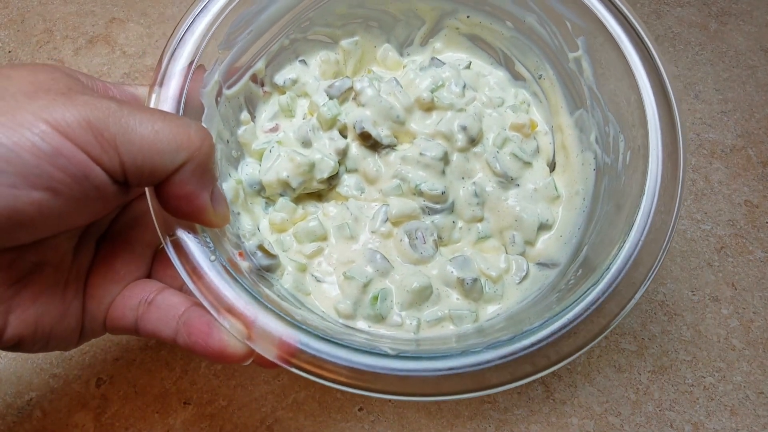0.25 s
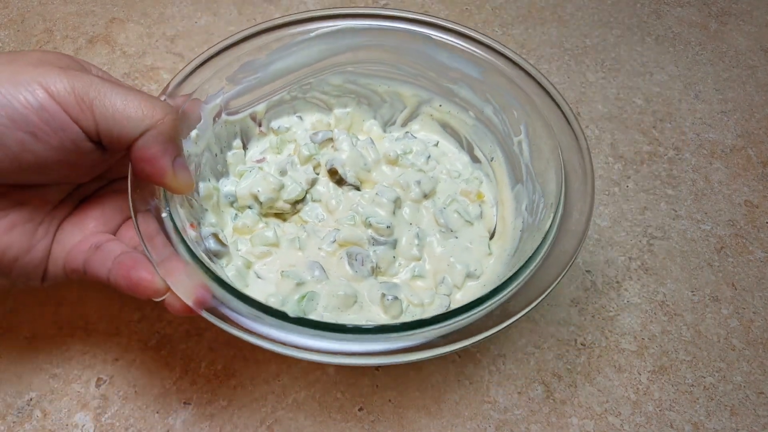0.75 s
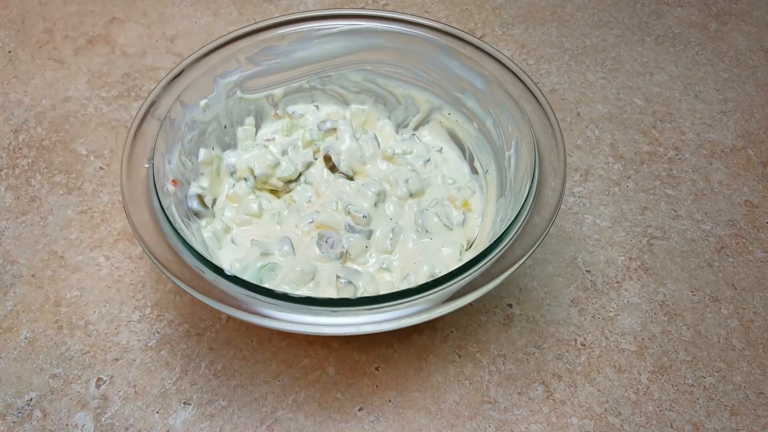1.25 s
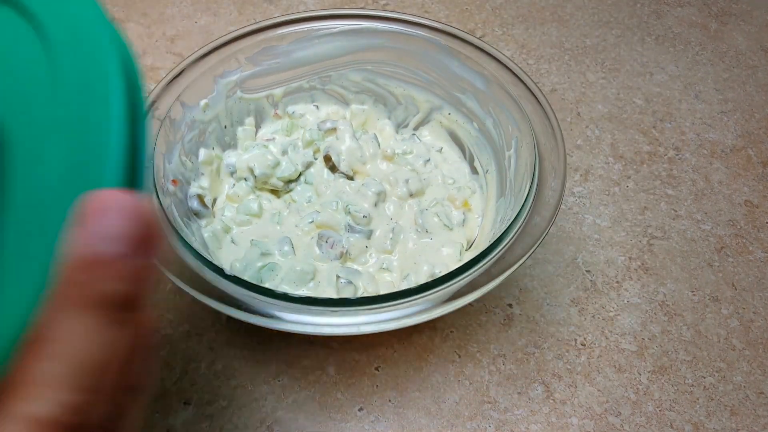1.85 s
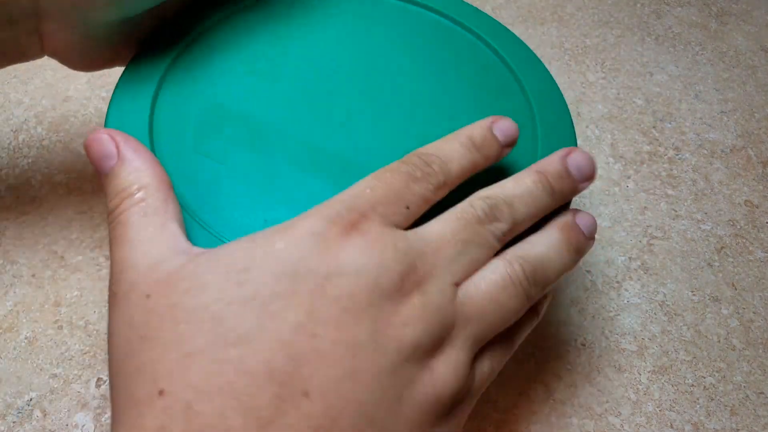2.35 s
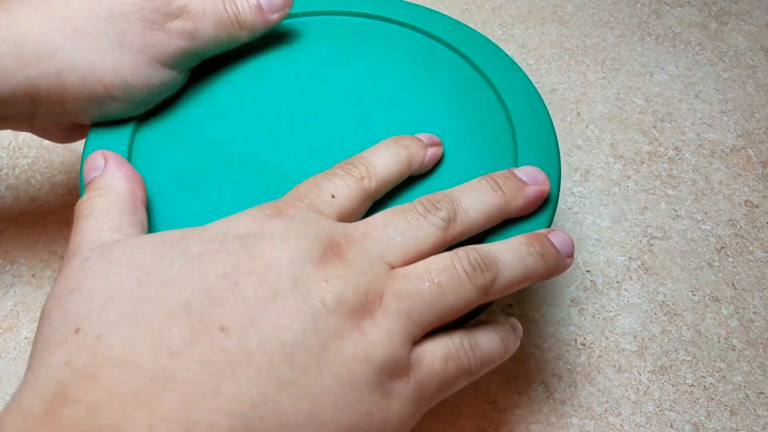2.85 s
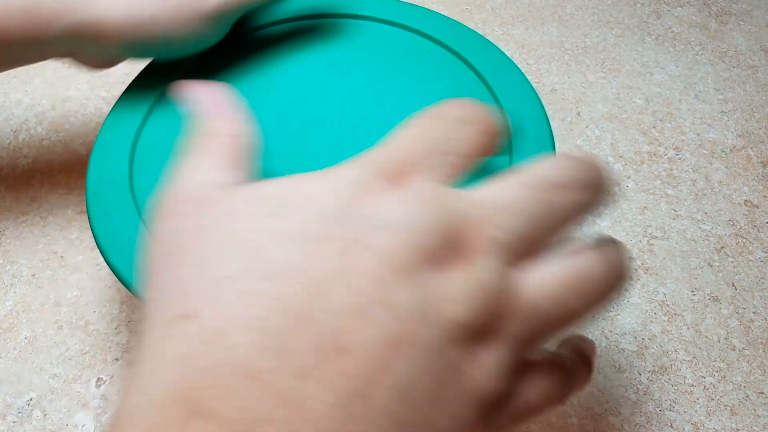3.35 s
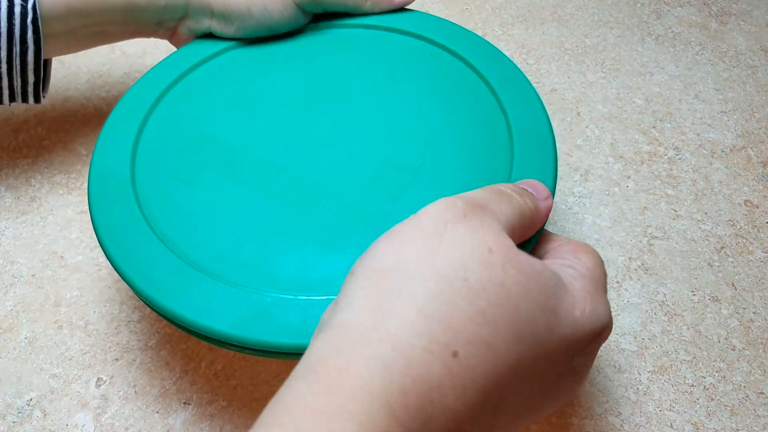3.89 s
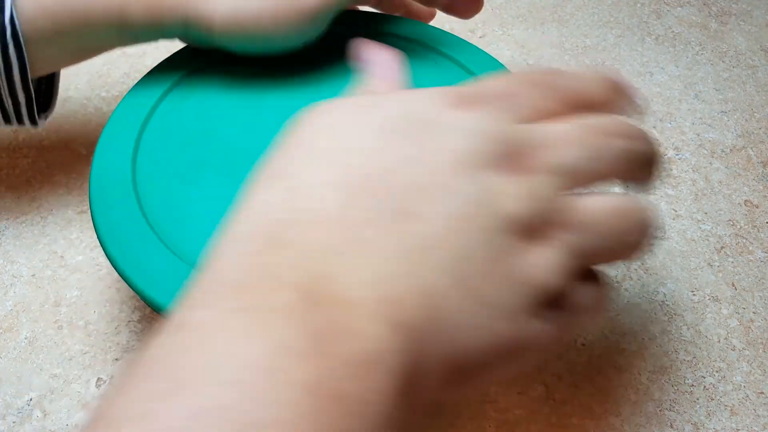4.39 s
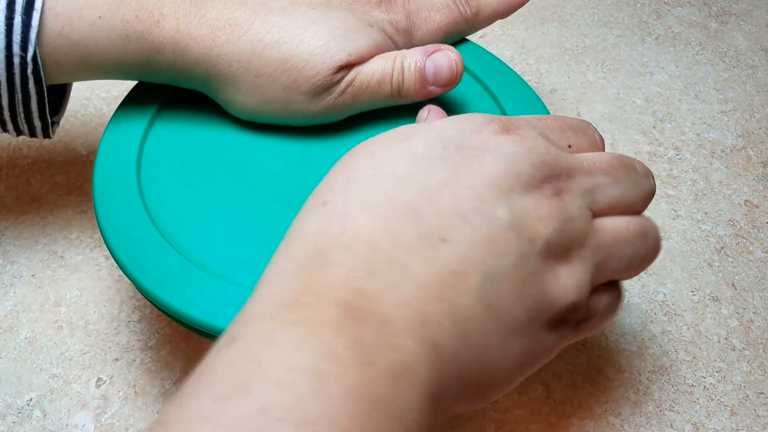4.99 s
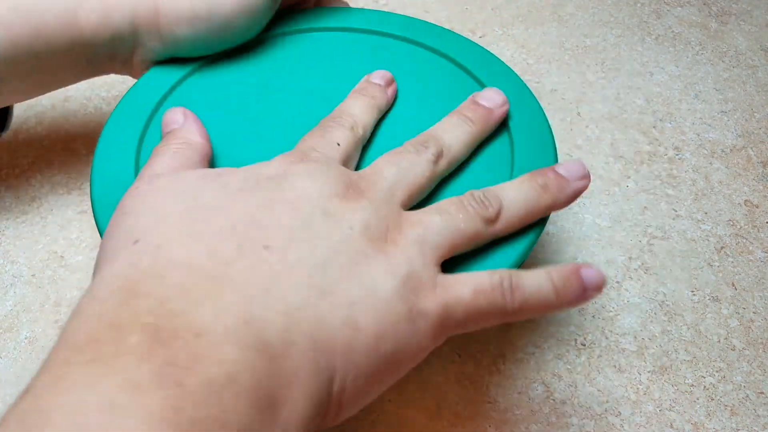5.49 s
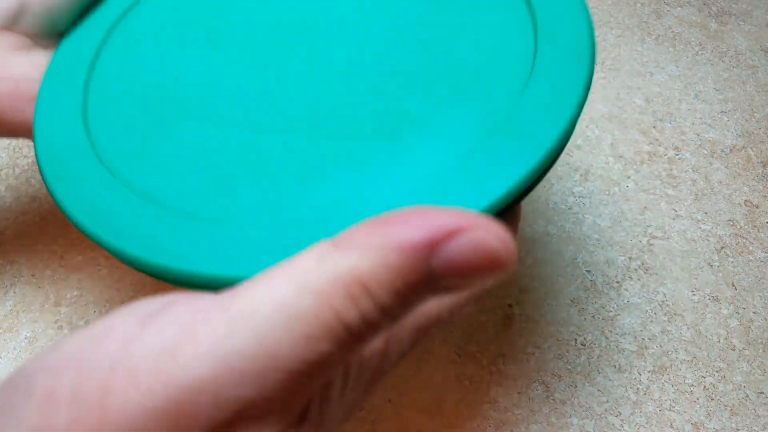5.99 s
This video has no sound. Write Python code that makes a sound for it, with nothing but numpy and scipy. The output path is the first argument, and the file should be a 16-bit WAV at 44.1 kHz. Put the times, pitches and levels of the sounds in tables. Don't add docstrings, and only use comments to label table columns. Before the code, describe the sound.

In a quiet kitchen with a low fridge hum, a heavy glass bowl lands on a hard counter with a knock and small rocking taps. Hands brush a plastic lid into place, then press it down in strong hollow snaps, with skin rubbing between them. Final knocks come as the bowl shifts. Close stereo microphones, short room reflections.

```python
import sys
import numpy as np
from scipy import signal
from scipy.io import wavfile
from scipy.ndimage import uniform_filter1d

SR = 44100
rng = np.random.default_rng(int(sys.argv[2]) if len(sys.argv) > 2 else 0)


def generate_wav(signal):
    frames = np.transpose(np.atleast_2d(signal))
    scaled = np.clip(frames, -1, 1) * 32767
    pcm = np.round(scaled).astype(np.int16)
    wavfile.write(sys.argv[1], SR, pcm)


def elevation(decibels):
    levels = np.asarray(decibels, float)
    return 10 ** (levels / 20)


N = 275004


def at_hz(points, hz):
    table_hz, value = np.transpose(points)
    return np.interp(np.log(hz), np.log(table_hz), value)


def rms_one(x):
    return x / np.sqrt(np.mean(x ** 2) + 1e-20)


def drift(rate):
    steps = rng.standard_normal(int(N / SR * 60) + 2)
    slow = uniform_filter1d(steps, size=max(1, int(30 / rate)), mode="wrap")
    return np.interp(np.arange(N) / SR * 60, np.arange(len(slow)), rms_one(slow))


def peak(x, hz, width):
    r = np.exp(-np.pi * width / SR)
    poles = [1, -2 * r * np.cos(2 * np.pi * hz / SR), r * r]
    return signal.lfilter([(1 - r * r) / 2, 0, (r * r - 1) / 2], poles, x)


def twice_peaked(x, hz, width):
    return rms_one(peak(peak(x, hz, width), hz, width))


def band_pass(low, high):
    return signal.butter(2, [low, high], "band", fs=SR, output="sos")


def coloured(spectrum, patchy_db, first=0):
    # frequency in Hz, left-right likeness (1 = same).
    likeness = [(30, 0.79), (250, 0.93), (1000, 0.024), (16000, 0.012)]
    edges = 25 * 2 ** np.arange(first / 2, 9.6, .5)
    white, together = rng.standard_normal((2, 2, N)), drift(44)
    out = 0
    for k, (low, high) in enumerate(zip(edges, edges[1:])):
        hz = np.sqrt(low * high)
        mid, side = signal.sosfilt(band_pass(low, high), white[k % 2])
        alike = np.clip(at_hz(likeness, hz), -1, 1)
        flicker_db = patchy_db * (together + .5 * drift(29))
        gain = elevation(at_hz(spectrum, hz) + flicker_db)
        out = out + gain * (np.sqrt(1 + alike) * mid + np.sqrt(1 - alike) * side * [[1], [-1]])
    return rms_one(out)


def room_tone():
    # frequency in Hz, level in dB per Hz.
    air_spectrum = [(15, -46), (25, 1), (59, 4.5), (92, -14), (134, 10), (206, -12), (242, -3), (394, 8),
                    (476, -8), (531, 9), (1020, -25.5), (1650, -19), (16000, -90)]
    # frequency in Hz, width in Hz, level in dB.
    hum_lines = [(124.8, 16, -61.5), (172.2, 38, -58), (243.6, 20, -55), (339, 39, -59), (484.8, 11, -65.5),
                 (1028, 7, -72.5), (5150, 200, -87), (12200, 300, -88)]
    white = rng.standard_normal((2, N))
    shared = white[0] + 0.27 * white[1] * [[1], [-1]]
    hum = sum(elevation(db) * twice_peaked(shared, hz, width) for hz, width, db in hum_lines)
    return hum + elevation(-54) * coloured(air_spectrum, patchy_db=0.4)


def kitchen(x):
    # low edge in Hz, high edge in Hz, t60 in seconds, level in dB.
    reflections = [(65, 103, .3, -16.5), (120, 254, 0.14, -4.5), (248, 440, 0.45, -12.5),
                   (455, 827, 0.23, -12), (717, 1440, 0.37, -17), (1190, 1740, 0.15, -16.5),
                   (2000, 2650, 0.16, -8), (3050, 4700, 0.16, -8.5), (4400, 11300, 0.35, -15),
                   (8100, 9000, 0.17, -3), (10800, 12000, .23, -5.5)]
    white, out = rng.standard_normal((2, 2, N)), 0
    for k, (low, high, t60, db) in enumerate(reflections):
        band = band_pass(low, high)
        held = elevation(-120 / (t60 * SR))
        energy = signal.sosfilt(band, x[0]) ** 2 + 1e-18
        stored = signal.lfilter([1 - held], [1, -held], energy)
        stored = signal.lfilter([.01], [1, -.99], stored)
        mid, side = rms_one(signal.sosfilt(band, white[k % 2]))
        apart = min(low / 900, 1)
        out = out + elevation(db) * np.sqrt(stored) * (mid + apart * side * [[1], [-1]])
    return out


def stroking():
    # start in seconds, length in seconds, scuff on counter and lid in dB,
    # skin hiss in dB.
    strokes = [(0.418, 0.2, -55.5, -77), (0.625, 0.028, -47.5, -83), (0.71, .11, -53.5, -76),
               (0.76, 0.39, -73, -60.5), (1.266, 0.31, -61, -62), (1.428, 0.13, -44.5, -64),
               (1.467, 0.4, -62, -63.5), (1.72, 0.66, -61.5, -63.5), (2.326, 0.27, -46.5, -69),
               (2.555, 0.052, -58, -73), (2.609, 0.25, -47, -64.5), (2.929, 0.43, -50.5, -64),
               (3.2, 0.51, -64, -67.5), (3.547, 0.073, -56.5, -78), (3.773, 0.049, -49.5, -67),
               (3.858, 0.25, -60, -71.5), (4.115, 0.17, -54.5, -64.5), (4.267, 0.062, -54, -63.5),
               (4.293, 0.2, -61, -71), (4.556, 0.16, -58, -63.5), (4.725, 0.17, -74, -61.5),
               (4.93, 0.098, -60, -61.5), (5.261, 0.22, -55, -61.5), (5.423, 0.13, -57.5, -62),
               (5.592, 0.19, -50, -66), (5.784, 0.2, -45.5, -70), (5.877, 0.31, -56, -86)]
    rise, fall = 0.27, 0.62
    t = np.arange(N) / SR
    power = elevation([[-62], [-74]]) ** 2
    for start, length, scuff_db, skin_db in strokes:
        done = (t - start) / length
        speed = np.clip(np.minimum(done / rise, (1 - done) / fall), 0, 1)
        power = power + (elevation([[scuff_db], [skin_db]]) * np.sin(np.pi / 2 * speed) ** 2) ** 2
    return np.sqrt(power)


def hands():
    # frequency in Hz, level in dB per Hz.
    scuff_spectrum = [(180, -65), (300, 24), (347, 0), (595, 3), (1200, 0), (1350, -2), (2500, -10.5),
                      (7000, -58), (9100, -64), (15400, -120)]
    # frequency in Hz, level in dB per Hz.
    skin_spectrum = [(1470, -26), (2500, -0.5), (5030, -5.5), (7360, -8), (8400, -2), (9220, -10),
                     (14700, -3), (16000, -8)]
    scuff_gain, skin_gain = stroking()
    slips = (rng.random(N) < 900 / SR) * rng.exponential(1, N)
    grain = 4 + signal.lfilter([1], [1, -np.exp(-1 / (.002 * SR))], slips)
    scuff = rms_one(grain * coloured(scuff_spectrum, .8, first=6))
    skin = coloured(skin_spectrum, 1.2, first=12)
    return elevation(2.0) * scuff_gain * scuff + elevation(5.0) * skin_gain * skin


def squeak():
    # start in seconds, end in seconds, frequency in Hz, width in Hz, level in dB.
    thumb_drag = (3.86, 3.99, 2100, 220, -68)
    start, end, hz, width, db = thumb_drag
    t = np.arange(N) / SR
    drag = np.clip(np.minimum(t - start, end - t) / 0.018, 0, 1)
    noise = rng.standard_normal(N)
    return elevation(db) * drag * sum(twice_peaked(noise, hz / k, width / k) for k in (1, 2))


def trapped_air():
    # start in seconds, level in dB, frequency in Hz, t60 in seconds.
    pushes = [(2.245, -24.5, 650, 0.057), (2.988, -30, 178, 0.051), (2.989, -17, 825, 0.031),
              (4.538, -22, 588, 0.06), (4.539, -38.5, 3100, 0.017), (3.782, -28, 238.5, 0.19),
              (3.9955, -3.5, 285, 0.062), (4.008, -11, 262, 0.067), (4.164, -37, 310.7, 0.27),
              (5.506, -3.5, 311, 0.047), (5.855, -27, 286, 0.12)]
    out = np.zeros(N)
    for s, db, hz, t60 in pushes:
        t = np.maximum(np.arange(N) / SR - s, 0)
        out += elevation(db - 60 * t / t60) * (1 - np.exp(-t * hz)) * np.sin(2 * np.pi * hz * t)
    return out * [[1], [1]]


def blows(rows):
    s, force_db, weight_db, hardness_db, brightness_db = np.transpose(rows)
    clack_db, thump_db, snap_db = force_db + hardness_db, force_db + weight_db, force_db + brightness_db
    crack_db = (clack_db + snap_db) / 2 + 6
    return list(zip(s, clack_db, force_db, thump_db, snap_db, crack_db))


def clicks(at, db, lag_s):
    out = np.full((2, N), 1e-18)
    np.add.at(out[0], (at * SR).astype(int), elevation(db[0]))
    np.add.at(out[1], ((at + lag_s) * SR).astype(int), elevation(db[1]))
    return out


def struck(hits, modes, lag_s, spread_db, softness, give_s, snap_db, snap_s):
    reach_hz = (110, 330, 900, 2400)
    # frequency in Hz, width in Hz, level in dB.
    snap_peaks = [(5500, 7800, 8), (8250, 14400, 10.5), (13800, 3800, 7.5)]
    at, clack, knock, thump, snap, crack = np.transpose(hits)
    drives_db = np.transpose([thump, knock, clack, crack])
    chance = rng.standard_normal((len(at), len(modes), 3))
    out = 0
    for k, (hz, db, t60) in enumerate(modes):
        force_db = np.array([np.interp(np.log(hz), np.log(reach_hz), row) for row in drives_db])
        sides_db = spread_db * min(.5 + hz / 900, 1.5) * chance[:, k, 1:].T
        sides_db = sides_db + (hz < 200) * np.array([[-1.3], [1.3]])
        moved = at + give_s * (hz < 500)
        train = clicks(moved, force_db + db + spread_db * chance[:, k, 0] + sides_db, lag_s)
        r, w = elevation(-60 / (t60 * SR)), 2 * np.pi * hz / SR
        soft = np.exp(-w / softness)
        swell = np.convolve([1, -2 * soft, soft ** 2], [1, -2 * r * np.cos(w), r * r])
        gain = np.sin(w) * (1 - soft) ** 2 * (1 + softness ** 2)
        out = out + signal.lfilter([0, gain], swell, train)
    train = clicks(at, np.tile(snap + snap_db, (2, 1)), lag_s)
    noise = rng.standard_normal(N)
    noise = np.array([noise, np.roll(noise, int(lag_s * SR))])
    burst = noise * signal.lfilter([1], [1, -np.exp(-1 / (snap_s * SR))], train)
    for k, (hz, width, db) in enumerate(snap_peaks):
        out = out + elevation(db) * (-1) ** k * peak(burst, hz, width)
    return out


def no_deep_bass(x):
    return signal.sosfilt(signal.butter(6, 62, "high", fs=SR, output="sos"), x)


def lid_on_rim():
    # start in seconds, force in dB, then weight, hardness and brightness
    # in dB against the force.
    lid_hits = [(0.438, -51, -8, 6, -22), (0.637, -70, -9, 6, -8), (1.756, -55, 22, 13.5, 18.5),
                (1.762, -56, 21, 15.5, 15.5), (2.227, -44.5, -27, 8, -6), (2.245, -33.5, -36, 12, -6.5),
                (2.298, -32, -13, -5.5, -10.5), (2.336, -58, 10, 13, 10.5), (2.63, -51, 16, -2, -4.5),
                (2.988, -6.5, -13, -7.5, -19), (2.994, -11, -15, -33, -28), (3.142, -31, -2.5, 1, -22),
                (3.55, -62, 15, 23, -35), (3.786, -28, -10, -28, -27), (3.9975, -9.5, -13, -10, -31.5),
                (4.011, -20, -13, -21, -30), (4.184, -56, 13, -5, 8.5), (4.501, -33.5, -25, -7, -35),
                (5.102, -38, 4, 11.5, -28.5), (5.107, -24, -2, -12, -22), (5.504, -3.5, -16.5, -15.5, -37),
                (5.512, -34, -26, -6, -13)]
    # start in seconds, force in dB, weight in dB against the force.
    presses = [
        (2.518, -37.5, -2),
        (2.936, -39.5, 5),
        (3.096, -40.5, 11),
        (3.6, -56, 18),
        (4.169, -23.5, -37),
        (4.62, -34.5, -1.5),
        (5.099, -26.5, -25),
    ]
    # start in seconds, snap in dB, crack in dB.
    ticks = [(0.169, -80, -68), (0.9556, -43.5, -37), (1.44, -64, -45), (1.5005, -49, -31.5),
             (2.5687, -47.5, -62), (2.52, -76, -62), (2.988, -23.5, -29), (3.9935, -30.5, -26.5),
             (4.154, -68, -49), (4.2847, -51.5, -45.5), (5.4953, -47, -41), (5.892, -48, -42),
             (5.903, -67, -66)]
    # frequency in Hz, level in dB,
    # t60 in seconds.
    lid_modes = [(59.3, 9, 0.1), (91.7, 6.5, 0.14), (142, 4, 0.078), (198, 7.5, 0.049), (260, -5, 0.16),
                 (273.5, -1, 0.035), (370.4, 0, 0.031), (470, -8, 0.06), (524, -68, 0.0053),
                 (614, -6, 0.072), (785, -9.5, 0.075), (928, -7, 0.049), (1252, 5.5, 0.051),
                 (1550, 11, 0.014), (1650, -106, 0.05), (1864, 10.5, 0.012), (2225, -0.5, 0.022),
                 (2500, 0, 0.013), (3216, -10, 0.027), (3930, -8, 0.017), (5270, -7.5, 0.006),
                 (930, 5, 0.0066), (3100, -1.5, 0.0018)]
    pads = [(*row, -14.5, -37.5) for row in presses]
    light = [(s, crack_db - 14, -90, -90, snap_db, crack_db) for s, snap_db, crack_db in ticks]
    touches = blows(lid_hits) + blows(pads) + light
    return elevation(-6) * struck(touches, lid_modes, lag_s=.0003, spread_db=1.8, softness=.7, give_s=.0015,
                            snap_db=8, snap_s=.003)


def bowl_on_counter():
    # start in seconds, force in dB, then weight, hardness and brightness
    # in dB against the force.
    bowl_hits = [(0.842, -7, -9.5, -7.5, -36), (0.868, -24, -20, -7, -34), (0.89, -41, 12, -2, -27),
                 (0.963, -23.5, 6, -15, -42), (0.968, -19.5, 3, -7.5, -46), (0.989, -28, -10, 3.5, -34),
                 (1.075, -32.5, 15, 3.5, -28), (1.081, -27.5, 3.5, -11, -29), (1.099, -39, -20, 1, -23),
                 (1.139, -40, -8, -7, -22), (4.422, -33, 4.5, -5, -59), (4.538, -22.5, -7, 1.5, -47.5),
                 (5.547, -18, 1, 3.5, -28.5), (5.574, -53, 20, -3, -36), (5.701, -9.5, -1, -3.5, -38),
                 (5.724, -15, -13, 2, -41), (5.79, -34, 6, -13, -37), (5.857, -28.5, -7.5, -10, -37)]
    # delay in seconds, then force,
    # weight, hardness and brightness in dB.
    rebound = (.012, -10, -23.5, -26, -23)
    # frequency in Hz, level in dB, t60 in seconds.
    counter_modes = [(61, -2, 0.35), (86.1, -0.5, 0.29), (123, 12, 0.054), (153, -33, 0.033),
                     (199, 7.5, 0.039), (283, -18.5, 0.27), (293, 3, 0.077), (344, 8, 0.069),
                     (399.3, 6, 0.06), (447.3, -13, 0.11), (546.4, -10, 0.23), (568, -5.5, 0.21),
                     (659, 6, 0.04), (752, 3, 0.044), (894, -7.5, 0.059), (940, -25, 0.0097),
                     (1080, 14, 0.014), (1222, 8, 0.017), (1530, 6, 0.036), (1647, -1, 0.063),
                     (1770, 6.5, 0.038), (2330, 7.5, 0.021), (2710, -2, 0.014), (3010, -15.5, 0.014),
                     (3340, -6, 0.019), (4700, -10, 0.008), (830, -2.5, 0.022), (2670, -88, 0.00029)]
    landings = blows(bowl_hits) + blows(np.add(bowl_hits, rebound))
    return -elevation(-6) * struck(landings, counter_modes, lag_s=.0002, spread_db=1.8, softness=.7, give_s=.0004,
                             snap_db=7, snap_s=.007)


def scene():
    bowl, lid = no_deep_bass(bowl_on_counter()), no_deep_bass(lid_on_rim())
    air = no_deep_bass(trapped_air())
    room = kitchen(lid + elevation(2.5) * bowl)
    no_top_air = signal.cheby2(14, 45, 15900, fs=SR, output="sos")
    quiet = signal.sosfilt(no_top_air, hands() + room + room_tone())
    return bowl + lid + air + quiet + squeak()


def band_limit(x):
    return signal.sosfilt(signal.butter(12, 16520, fs=SR, output="sos"), x)


def record(dry):
    rounded = .92 * np.tanh(dry / .92)
    rounded = signal.sosfilt(signal.butter(2, 32, "high", fs=SR, output="sos"), rounded)
    cut = signal.sosfilt(signal.cheby2(14, 60, 16700, fs=SR, output="sos"), rounded)
    return band_limit(cut)


dry = scene()
out = record(dry)
generate_wav(out)
```